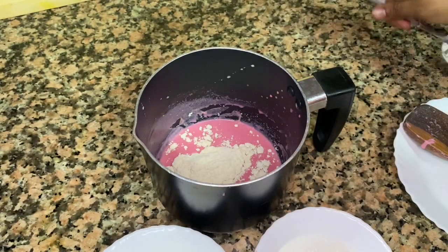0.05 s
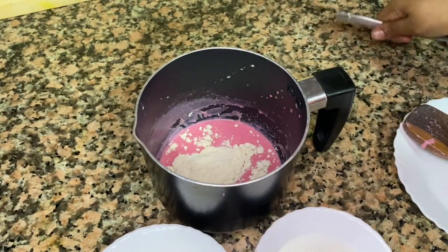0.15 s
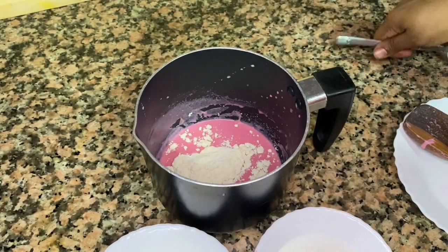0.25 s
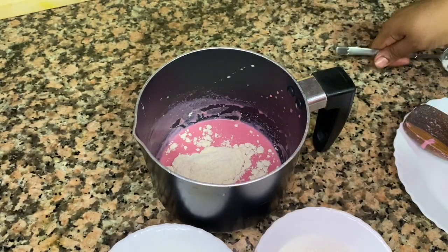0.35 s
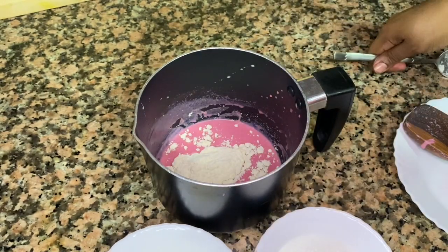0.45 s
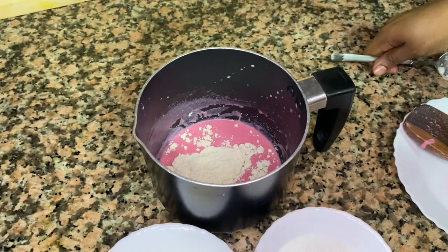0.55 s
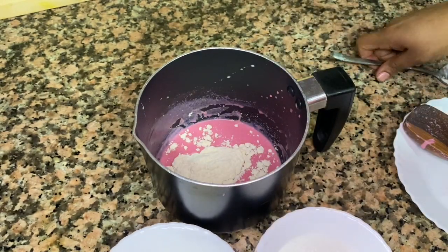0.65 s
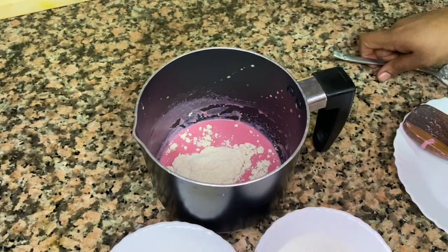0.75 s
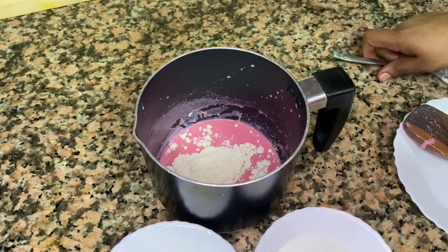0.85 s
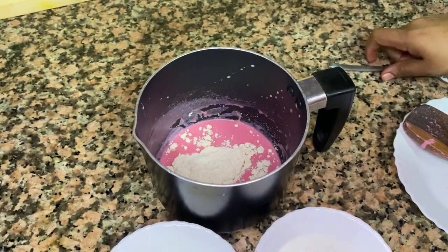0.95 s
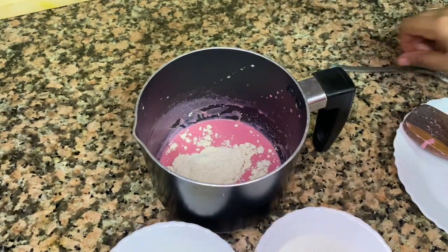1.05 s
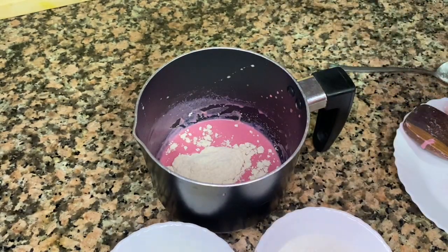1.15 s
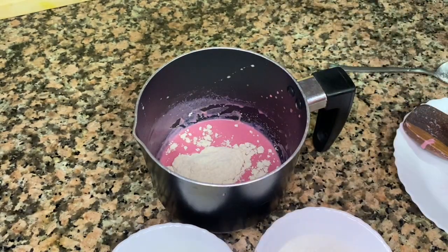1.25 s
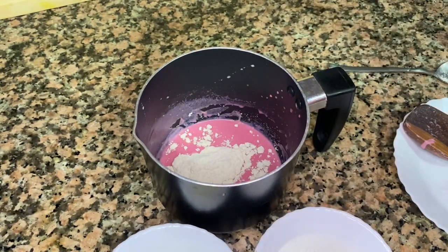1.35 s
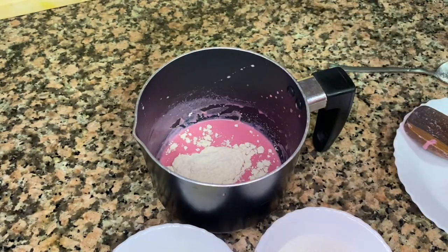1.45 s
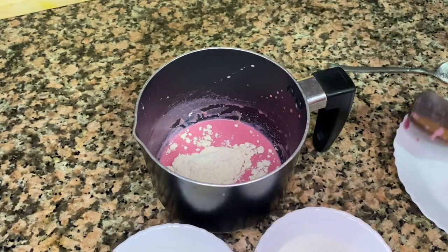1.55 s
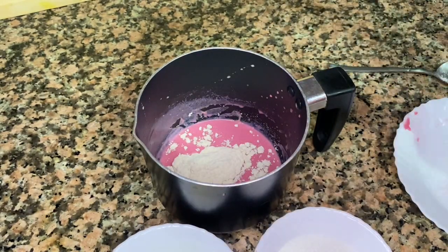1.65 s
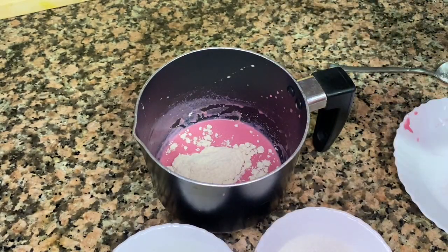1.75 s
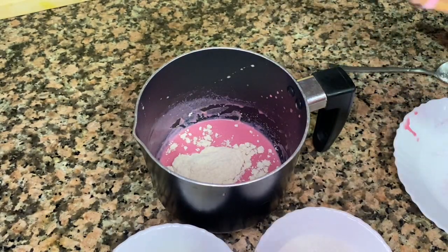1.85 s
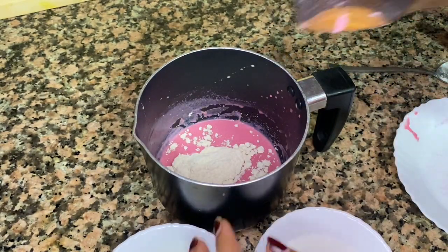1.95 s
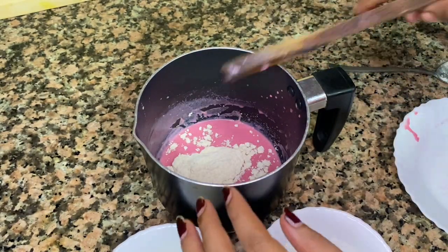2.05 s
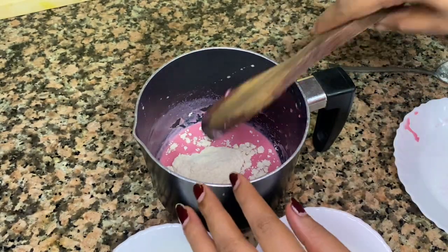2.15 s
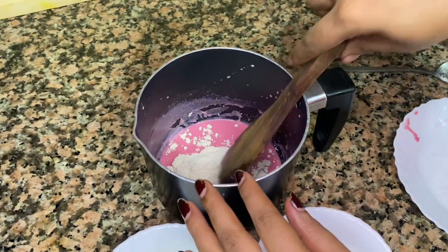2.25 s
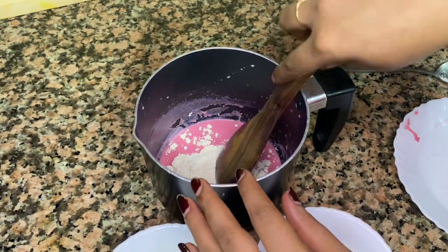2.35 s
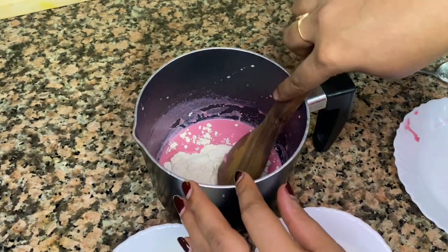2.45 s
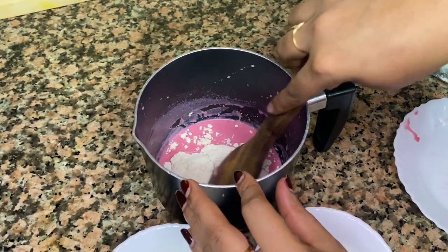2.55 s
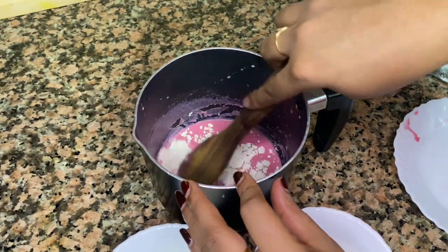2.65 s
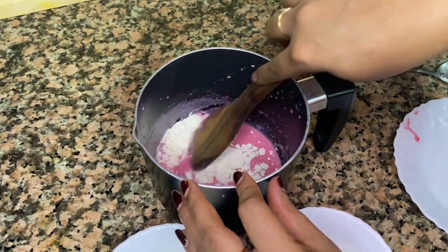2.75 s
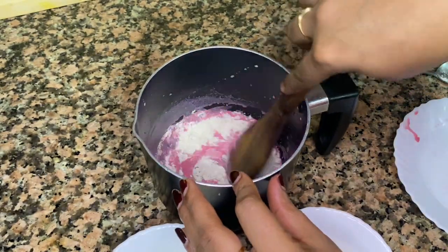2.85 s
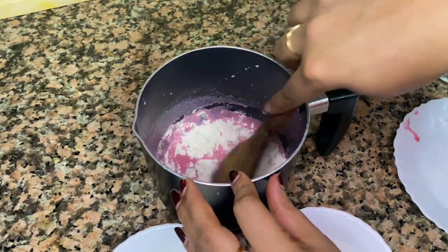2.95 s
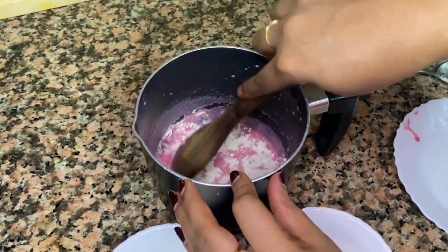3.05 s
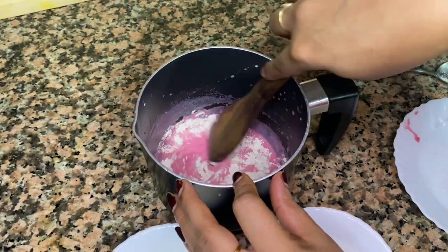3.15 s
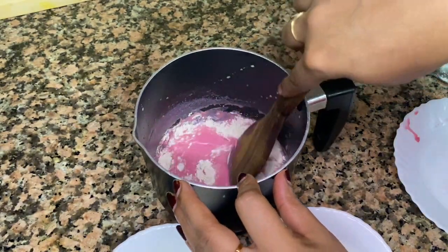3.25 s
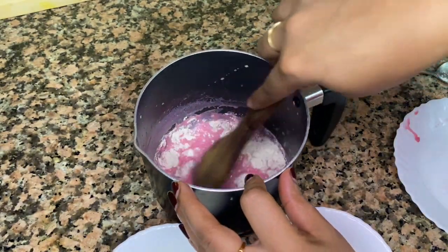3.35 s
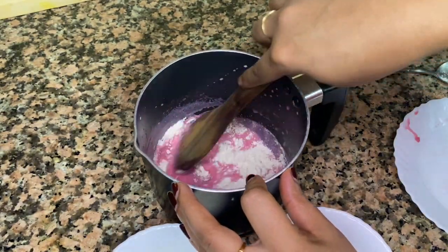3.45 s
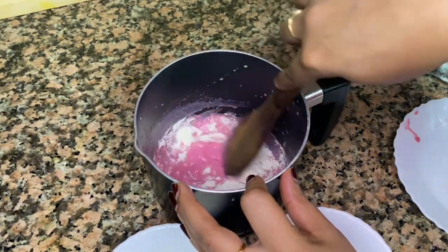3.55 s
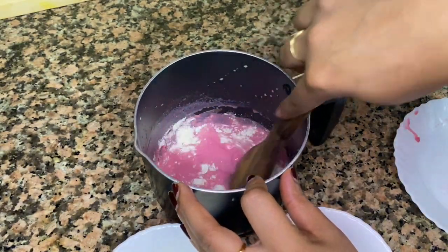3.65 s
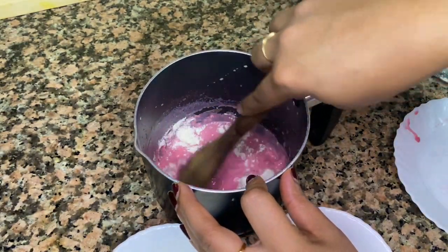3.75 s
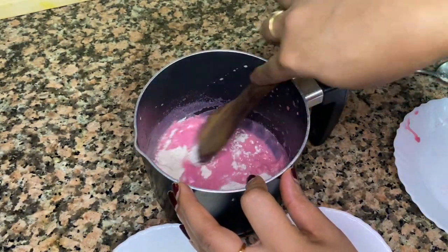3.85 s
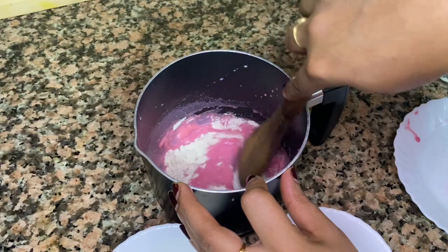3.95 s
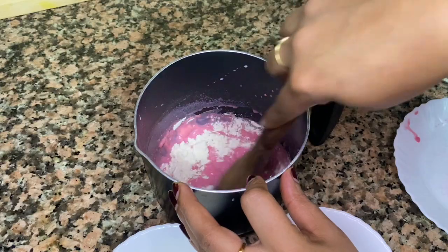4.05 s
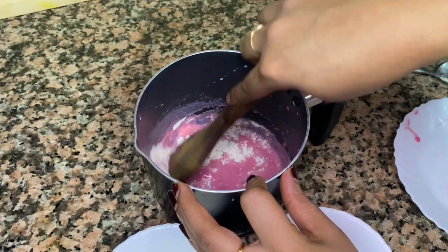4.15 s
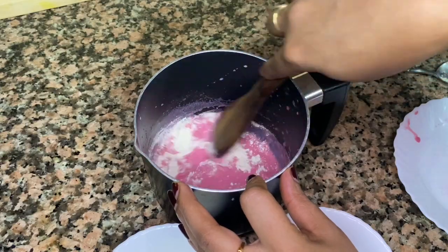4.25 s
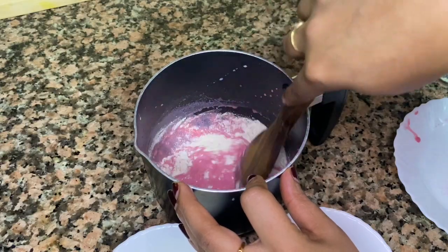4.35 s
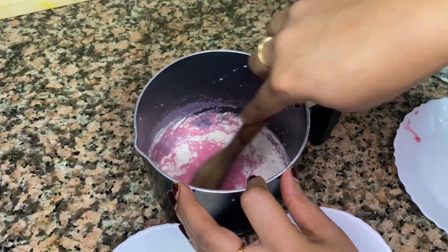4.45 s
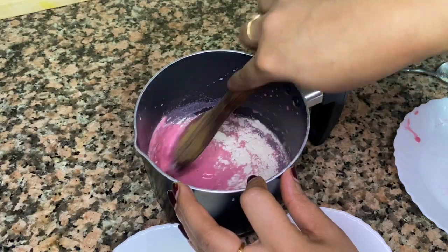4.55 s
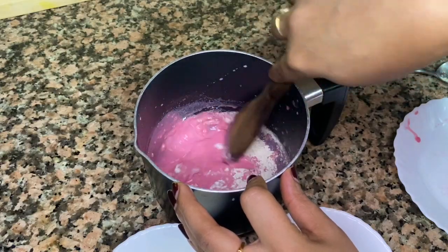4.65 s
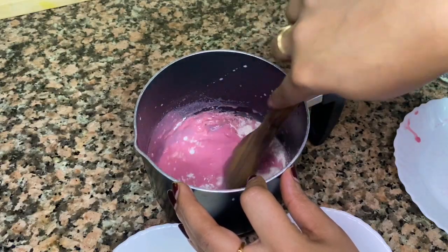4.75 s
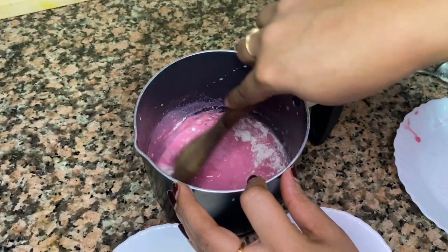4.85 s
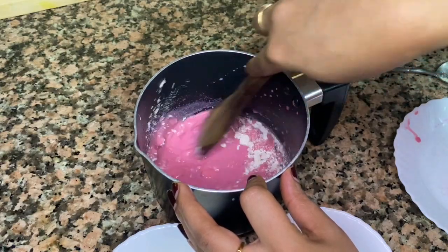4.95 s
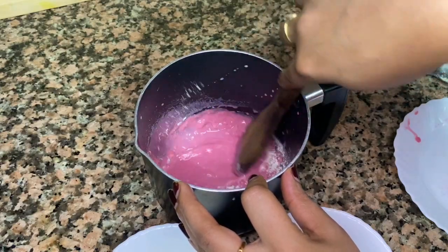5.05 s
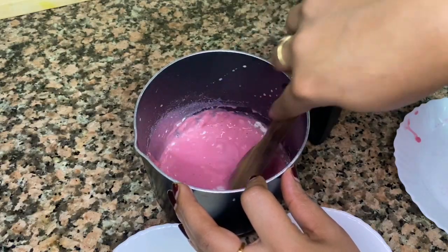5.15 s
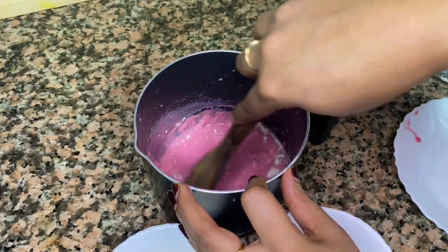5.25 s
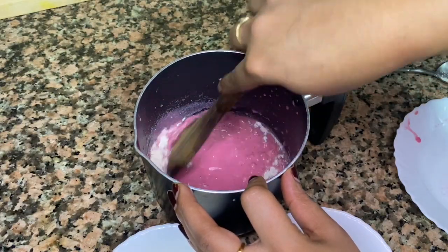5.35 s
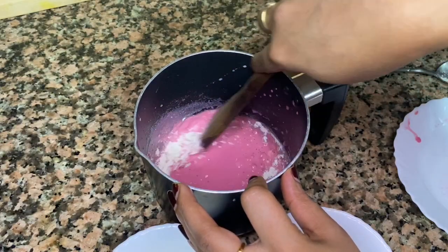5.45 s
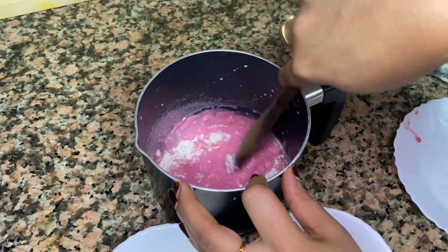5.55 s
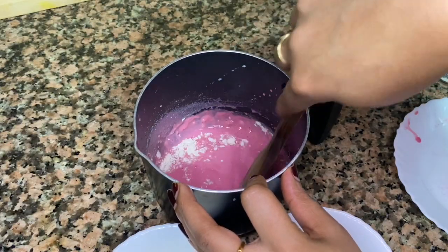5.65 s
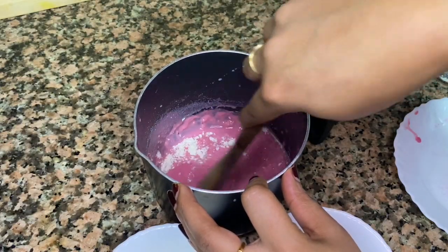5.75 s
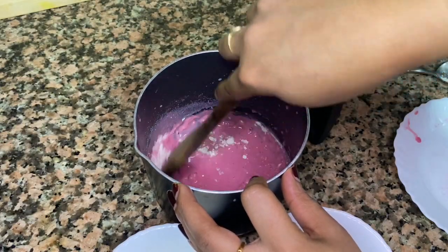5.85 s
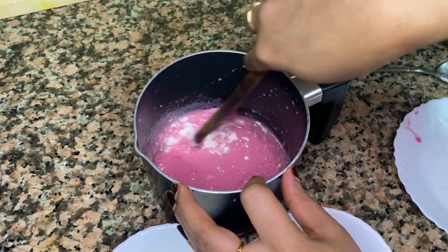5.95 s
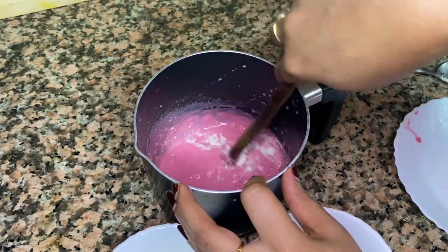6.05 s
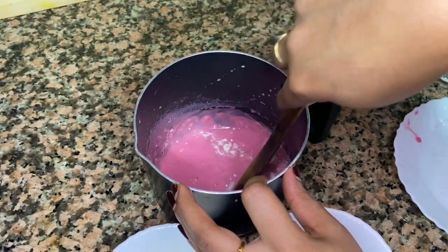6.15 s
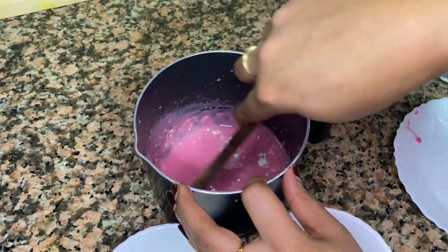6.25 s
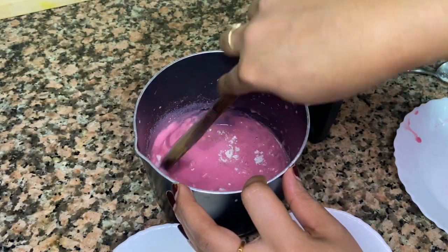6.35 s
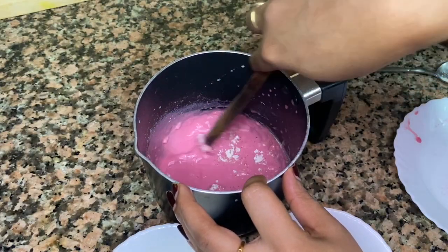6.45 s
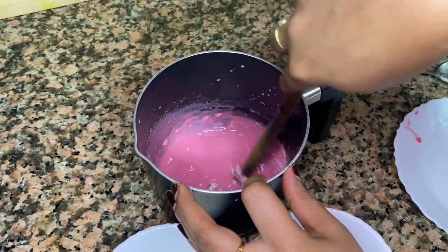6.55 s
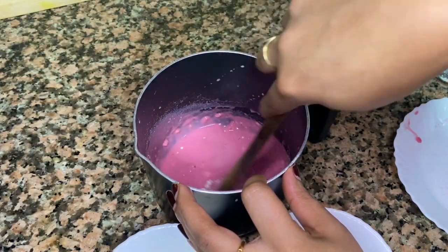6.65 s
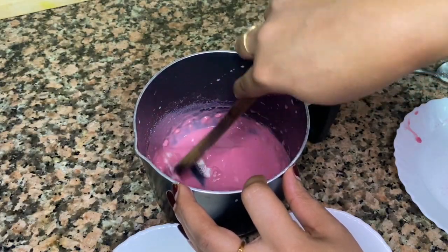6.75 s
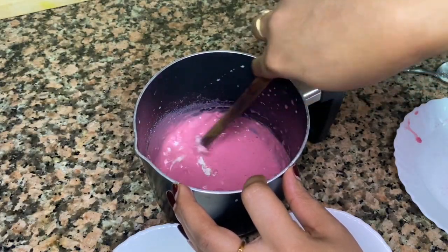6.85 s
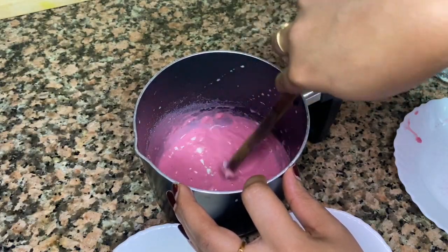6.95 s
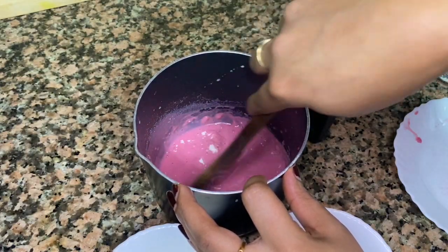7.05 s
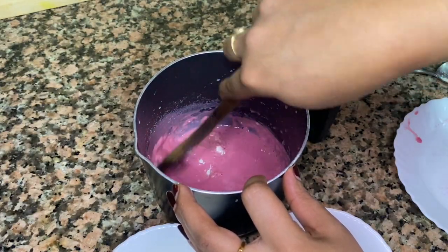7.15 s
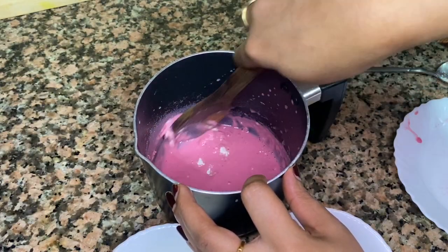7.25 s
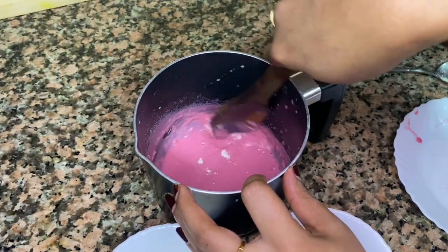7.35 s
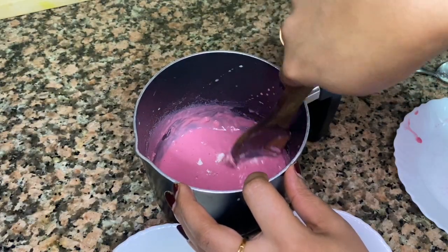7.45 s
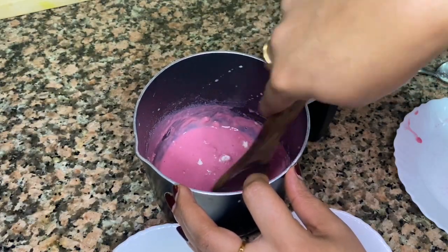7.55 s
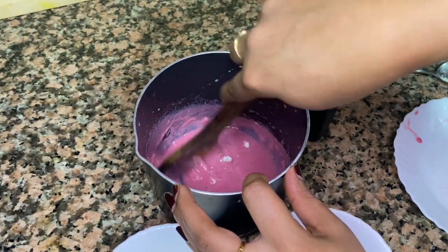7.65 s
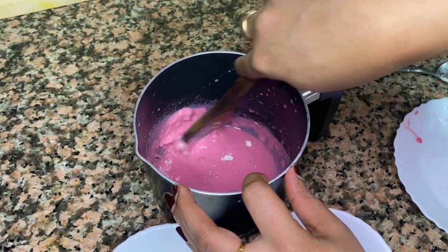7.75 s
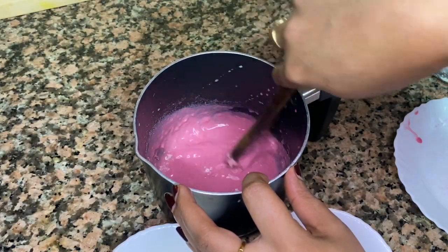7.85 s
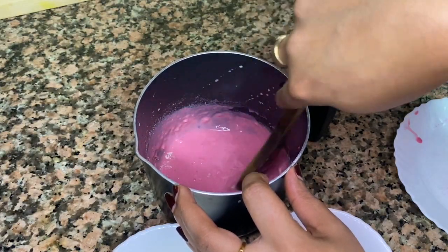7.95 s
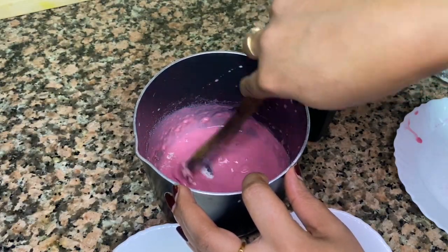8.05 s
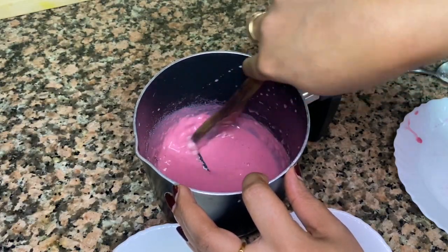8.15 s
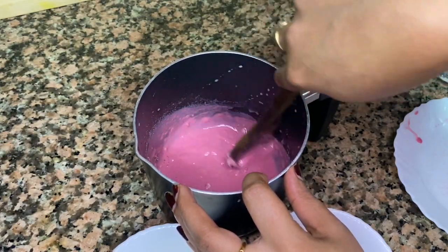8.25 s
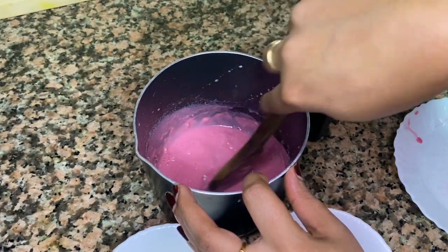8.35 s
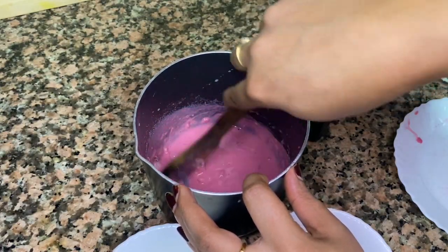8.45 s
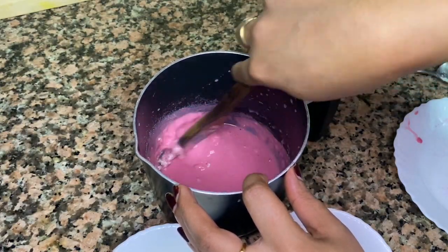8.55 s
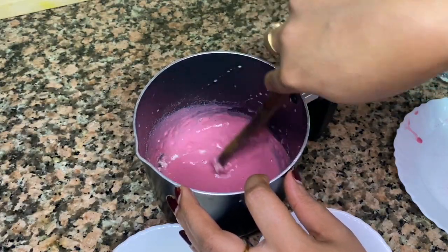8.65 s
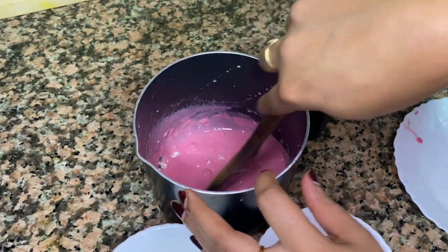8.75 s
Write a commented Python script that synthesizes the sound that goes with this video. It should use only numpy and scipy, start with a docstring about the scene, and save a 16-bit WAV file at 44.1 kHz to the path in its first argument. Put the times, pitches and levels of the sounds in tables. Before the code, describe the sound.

A metal spoon clatters and rings on a stone counter, then a wooden spatula steadily scrapes and knocks while stirring thick liquid in a small pan.

```python
"""In a small, hard kitchen, a steel spoon is laid on a stone counter, where it chatters and rings.
A wet wooden spatula slides off a plate, fingers steady a small saucepan, and the spatula stirs powder into
a thick liquid, two or three turns a second: it judders over the bottom, scrapes along the wall, knocks the pan.
Metal rings are fading tones, knocks are brief noises through resonances, rubbing is a rush of random tiny pushes."""
import sys
import numpy as np
from scipy import signal
from scipy.fft import rfft, irfft, next_fast_len
from scipy.io import wavfile
from scipy.ndimage import uniform_filter1d, map_coordinates

SR = 44100
rng = np.random.default_rng(int(sys.argv[2]) if len(sys.argv) > 2 else 0)


def store_wav(level_fs):
    """Save 16-bit WAV to argv[1]."""
    pcm = np.round(np.clip(np.atleast_2d(level_fs), -1, 1) * 32767)
    wavfile.write(sys.argv[1], SR, pcm.T.astype(np.int16))


N = 388080  # length in samples

# In all tables the levels are relative: each sound adds its own fixed offsets. "Fade time" is for 60 dB.

# Colour of the room noise. Each row: frequency in Hz, level in dB.
FLOOR_COLOUR = [(12, -46.5), (20, -13.5), (86, -0.5), (172, -14), (204, -4.5), (228, -15), (738, -18),
                (897, -17), (2320, -25.5), (4670, -27), (5380, -28), (7950, -28), (9400, -29),
                (16000, -24.5)]
HUSH_DB = -58.5  # level of the room noise
# How long the kitchen echoes. Each row: frequency in Hz, fade time in seconds.
KITCHEN_FADE = [(100, 0.22), (500, 0.41), (2000, 0.27), (8000, 0.31), (15000, 0.12)]
TOP_HZ = 15900  # middle of the cutoff at the top of the microphone's band
# One dry click: start in seconds, peak level in dB.
DRY_CLICK = (1.4559, -23)

# Dull clacks of utensils and crockery on the counter. Each row: start in seconds, level in dB.
COUNTER_CLACKS = [(0.264, -12), (0.27, -16.5), (0.289, -25.5), (0.362, -24), (0.386, -27), (0.393, -26),
                  (0.409, -19.5), (0.717, -30), (0.729, -29), (0.935, -21.5), (1.291, -34.5),
                  (1.309, -25.5), (1.316, -31), (1.34, -37), (1.407, -31), (1.412, -29)]
# Colour of a clack. Each row: frequency in Hz, level in dB.
CLACK_COLOUR = [(59, -50), (100, -7.5), (271, -18.5), (608, -10.5), (818, -13), (1420, 1), (1580, -10),
                (2860, -16.5), (3320, -28.5), (3780, -25.5), (4110, -54), (9020, -57), (13200, -36),
                (15000, -29.5), (16000, -35.5)]
# Hollow ring of the clacks. Each row: frequency in Hz, width in Hz, level in dB.
STONE_RING = [(1057, 64, -4), (1232, 32, 5.5), (1310, 110, -2.5), (1581, 23, -10.5), (3530, 25, -22.5)]

# The spoon strikes the stone. Each row: start in seconds, contact level in dB, ring level in dB,
# ring length as a share of full length (0-1).
SPOON_STRIKES = [(0.407, -18.5, -33.5, 0.27), (.936, -9, -10.5, 1), (.944, -12.5, -21, .08),
                 (0.961, -21.5, -26, .2), (1.0, -17, -30.5, .3)]
# Tones of the spoon's steel. Each row: frequency in Hz, level in dB, fade time in seconds at full length.
STEEL_TONES = [(3029, -7, .28), (3402, -26, .3), (3934, -13, .32), (3957, -17, .3), (5336, -17, .48),
               (5631, -2.5, .26), (7372, -14.5, .34), (7411, -12, .34), (8912, -2.5, .3), (9112, -14, .25),
               (11562, 2, .29), (11680, -15, .22), (11786, -14, .2), (12340, -10, .27), (13743, -7, .25),
               (14640, -9, .2), (14700, -12, .2), (14850, -2.5, .22)]
# The spoon's bowl first bumps the counter: start in seconds, ring level in dB.
BOWL_BUMP = (.264, -37)
# Tones of that bump. Each row: frequency in Hz, level in dB, fade time in seconds at full length.
BOWL_TONES = [(3700, -10, 0.41), (10640, 2, 0.035), (12860, -12, .2), (13740, -5, 0.17), (15000, -2, 0.18)]
# The spoon touches down while still in the fingers: start in seconds, ring level in dB.
HELD_TOUCH = (.408, -31)
# Tones of that touch. Each row: frequency in Hz, level in dB, fade time in seconds at full length.
TIP_TONES = [(3040, -2.5, 0.19), (4090, 1.5, 0.06), (5170, -9, 0.14), (8900, -7, 0.22), (11540, -21, .28),
             (12350, -8.5, 0.46), (14790, -8, 0.53)]
# Light taps of the spoon's handle. Each row: start in seconds, level in dB.
HANDLE_TAPS = [(.718, -35), (.729, -39)]
# Tones of those taps. Each row: frequency in Hz, level in dB, fade time in seconds at full length.
HANDLE_TONES = [(3820, -3, .18), (6580, 0.5, 0.049), (9695, -16, .18), (13300, -7, .09)]

# The spatula slides off the plate. Each row: start in seconds, length in seconds, hiss level in dB.
PLATE_SLIDES = [(1.495, 0.15, -51), (1.795, .005, -55)]
# Colour of that hiss. Each row: frequency in Hz, level in dB.
SMEAR_COLOUR = [(1180, -56), (2000, -17), (3340, -13), (4050, -16), (4940, -2.5), (7310, -12), (9010, -3),
                (14400, -7), (16000, -5)]
# Sticky ticks of the wet mixture. Each row: start in seconds, level in dB.
STICKY_TICKS = [(1.6717, -31), (1.6887, -29.5), (1.8, -33.5), (2.1672, -50), (2.7864, -33), (3.4378, -31),
                (4.0818, -32), (4.2067, -28), (4.875, -27), (4.8834, -30.5), (5.009, -33), (5.2936, -37),
                (5.3485, -36.5), (6.231, -26), (6.7687, -31), (7.1306, -25)]
# Colour of a tick. Each row: frequency in Hz, level in dB.
TICK_COLOUR = [(500, -24), (3000, -15.5), (9000, -7), (13500, -1.5), (16000, 2)]

# Thumps against the pan and the counter. Each row: start in seconds, then the levels of
# thud, body and edge in dB.
PAN_KNOCKS = [(2.168, -54, -52, -67), (2.307, -34, -42.5, -66), (2.402, -31.5, -33.5, -45),
              (2.788, -33.5, -39, -61), (2.831, -42, -40, -38.5), (2.879, -37.5, -36, -42),
              (3.575, -35.5, -47, -45), (3.866, -46, -52, -44), (3.926, -36, -46, -38),
              (4.273, -25.5, -39, -34.5), (4.32, -33, -29.5, -40.5), (4.681, -31, -35, -39.5),
              (4.884, -35, -31.5, -55), (5.012, -29, -48, -36.5), (5.097, -27, -24, -35),
              (5.52, -28.5, -37.5, -49), (5.611, -25.5, -33.5, -37), (5.700, -29.5, -30, -20),
              (6.015, -42, -36, -66), (6.075, -32.5, -53, -43.5), (6.119, -33, -31.5, -49),
              (6.233, -38.5, -26.5, -33.5), (6.549, -27.5, -34, -53), (6.578, -41, -27.5, -58),
              (6.775, -51, -50, -36.5), (6.921, -56, -34.5, -55), (7.135, -37.5, -25, -30.5),
              (7.374, -27, -40, -36), (7.401, -37, -34, -40.5), (7.467, -28.5, -27.5, -42),
              (7.718, -44.5, -31, -46.5), (7.751, -48, -37.5, -50), (8.211, -62, -33, -49),
              (8.242, -56, -34, -48), (8.617, -53, -30.5, -53)]
# Thud: the pan on the counter. Each row: frequency in Hz, width in Hz, level in dB.
THUD_RESONANCES = [(122.4, 15, 1), (205, 15.3, 1), (258, 31, -7.5), (367.5, 37.6, 1.5)]
# Body: the air in the pan. Each row: frequency in Hz, width in Hz, level in dB.
BODY_RESONANCES = [(365, 26.5, -5.5), (464, 29.4, -0.5), (565, 112, 2.5), (611, 106, 2.5)]
# Edge: the wall of the pan. Each row: frequency in Hz, width in Hz, level in dB.
EDGE_RESONANCES = [(768, 50, 4.5), (1094, 280, 2), (1152, 135, 5), (1404, 58, -1), (1686, 83, 0.5),
                   (2060, 200, -15), (2630, 150, -30), (3920, 210, -27)]
# Tones of the pan's metal. Each row: frequency in Hz, level in dB, fade time in seconds at full length.
PAN_TONES = [(251, -7.5, 0.42), (331, 8.5, 0.27), (488, -7.5, 0.24), (726, 3, 0.41), (1400, -9.5, 0.29)]
GRIP_S = 2.6  # from here on the fingers damp the pan

# The blade swipes along the wall, between pushes and during them. Each row: start in seconds,
# length in seconds, rasp level in dB, grit level in dB.
WALL_SCRAPES = [(2.6, 0.17, -61, -57), (2.735, 0.19, -53.5, -50.5), (3.04, 0.087, -54.5, -52.5),
                (3.305, 0.13, -50.5, -50.5), (3.55, 0.18, -53.5, -61), (3.69, 0.13, -53.5, -50),
                (3.92, 0.016, -49.5, -65), (4.045, 0.022, -51.5, -45.5), (4.21, 0.073, -57.5, -51),
                (4.405, 0.046, -48.5, -49.5), (4.59, 0.028, -67, -49.5), (4.785, 0.02, -46, -51),
                (4.87, 0.17, -76, -56.5), (5.165, 0.023, -45.5, -48), (5.54, 0.13, -54, -69),
                (5.685, 0.017, -54, -48), (5.83, 0.14, -66.5, -57), (6.2, 0.037, -48.5, -50),
                (6.31, 0.13, -59, -57), (6.55, 0.02, -47.5, -55.5), (6.665, 0.04, -41.5, -47),
                (6.775, 0.073, -57, -53.5), (7.025, 0.046, -47, -49), (7.39, 0.051, -48.5, -57.5),
                (7.56, 0.082, -49, -46.5), (7.73, .1, -59, -60), (8.04, 0.035, -38.5, -49.5),
                (8.38, 0.035, -45.5, -50), (8.785, .03, -40.5, -59)]
SCRAPE_ATTACK_S, SCRAPE_RELEASE_S = 0.065, 0.11  # time to swell and to fade by 20 dB
# Fingers brush the pan as they take hold. Each row: start in seconds, length in seconds,
# rasp level in dB, grit level in dB.
FINGER_TOUCH = [(2.168, .012, -48, -53.5)]
# Colour of the rasp. Each row: frequency in Hz, level in dB.
RASP_COLOUR = [(440, -20), (750, -7), (778, -4), (945, -4.5), (1040, 0.5), (1150, 2), (1260, -6.5),
               (1440, -0.5), (1650, -6), (2380, -6), (2570, -19), (2850, -12), (3200, -9), (4160, -62),
               (7040, -120)]
# Colour of the grit. Each row: frequency in Hz, level in dB.
GRIT_COLOUR = [(1290, -18), (2200, -10), (2550, 0.5), (2850, -11.5), (4070, -1), (5300, -5.5), (6260, -3),
               (6580, -5), (8950, -10.5), (10700, -11.5), (12900, -14.5), (14800, -20), (16000, -13)]
# The hollow of the pan. Each row: frequency in Hz, width in Hz, level in dB.
WALL_RESONANCES = [(1046, 19, -4), (1527, 270, 14.5), (1730, 68, 2), (2324, 49, 7), (4130, 56, -10),
                   (6440, 43, 8.5), (7500, 173, -13)]

# The blade pushes the mixture over the bottom, about once a turn. Each row: start in seconds,
# length in seconds, level in dB.
BOTTOM_PUSHES = [(2.727, .16, -47), (3.074, 0.12, -46.5), (3.468, 0.12, -43), (3.844, 0.085, -42),
                 (4.112, 0.2, -42.5), (4.495, 0.19, -44), (4.88, 0.2, -43.5), (5.31, 0.066, -43.5),
                 (5.513, 0.15, -45.5), (5.807, 0.15, -43.5), (6.039, 0.14, -47.5), (6.299, 0.33, -43),
                 (6.849, 0.145, -46), (7.142, 0.094, -46), (7.444, 0.098, -48), (7.684, 0.25, -43.5),
                 (8.1, 0.16, -43.5), (8.519, .15, -43.5)]
PUSH_ATTACK_S, PUSH_RELEASE_S = 0.078, 0.046  # time to swell and to fade by 20 dB
PUSH_RASP_DB, PUSH_GRIT_DB = -14, -18.5  # rasp and grit gain of a push, relative to its judder gain
CREST_DB = 1  # every stroke is firmest halfway through, by this much over its ends
# Colour of the judder. Each row: frequency in Hz, level in dB.
JUDDER_COLOUR = [(76, -92), (130, -7), (194, -32), (226, -21.5), (363, -4), (397, -11.5), (467, -4.5),
                 (497, -10), (589, -7), (700, -8), (805, -27), (945, -25), (1100, -22), (1430, -62.5),
                 (2420, -120)]
# The air under the blade. Each row: frequency in Hz, width in Hz, level in dB.
CAVITY_RESONANCE = [(576, 111, 0)]
NOTE_SAG, NOTE_WAVER = 0.06, 0.03  # depth of the note's fall, to either side, and waver (shares of its pitch)
STIR_S = 2.73  # from here on the blade always drags a little
DRAG_JUDDER_DB, DRAG_RASP_DB, DRAG_GRIT_DB = -61.5, -59, -63.5  # gain of that drag at its start
THICKEN_DB_PER_S = 2.5  # the drag judders more as the powder thickens the liquid


def amp(db):
    """Decibels to gain."""
    return 10 ** (np.asarray(db) / 20)


def unit(x):
    """Scale to an average (rms) level of 1."""
    return x / np.sqrt(np.mean(x ** 2) + 1e-20)


def peaked(x):
    """Scale to peak 1."""
    return x / np.abs(x).max()


def along(points, hz):
    """Read a curve of (Hz, value) points on a logarithmic frequency axis."""
    point_hz, value = np.transpose(points)
    return np.interp(np.log(hz + 1), np.log(point_hz + 1), value)


def wobble(rate, size):
    """A smooth random curve through `rate` random points a second."""
    points = rng.standard_normal(size // 50)
    return map_coordinates(points, [np.arange(size) * rate / SR], mode="wrap")


def filtered(x, response):
    """Multiply the spectrum of x by a response of frequency."""
    size = next_fast_len(len(x) + SR // 4)
    hz = np.fft.rfftfreq(size, 1 / SR)
    return irfft(rfft(x, size) * response(hz), size)[:len(x)]


def coloured(x, spectrum):
    """Give x the tone colour of (Hz, dB) points, with a filter that never sounds before its input."""
    size = 4096
    gain = amp(along(spectrum, np.fft.rfftfreq(size, 1 / SR)))
    cepstrum = irfft(np.log(gain + 1e-6))
    # folding the cepstrum onto its first half makes the filter react as early as it can (minimum phase)
    fold = 1 + np.sign(size // 2 - np.arange(size))
    fold[0] = 1
    kernel = irfft(np.exp(rfft(cepstrum * fold)))
    return signal.fftconvolve(x, kernel)[:len(x)]


def resonant(x, peaks):
    """Pass x through side-by-side resonances of (Hz, width Hz, dB), with alternating signs."""
    def response(hz):
        total = 0
        for k, (centre, width, db) in enumerate(peaks):
            loss = 1j * hz * width
            total = total + (-1) ** k * amp(db) * loss / (centre * centre - hz * hz + loss)
        return total
    return filtered(x, response)


def add(track, s, sound):
    """Mix a sound into the track at time s."""
    part = track[round(s * SR):][:len(sound)]
    part += sound[:len(part)]


def burst(t60):
    """Noise that dies away by 60 dB in t60 seconds."""
    t = np.arange(SR // 3) / SR
    return amp(-60 * t / t60) * rng.standard_normal(len(t))


def contact(t60, chatter):
    """One push, together with the brief noisy chatter of the touching surfaces."""
    rattle = burst(t60)
    return signal.unit_impulse(len(rattle)) + chatter * rattle / np.linalg.norm(rattle)


def ring(modes, length, waver, rattle_s=0):
    """Fading tones that waver as the metal rocks; while it rattles they fade at half speed and sound rough."""
    t = np.arange(SR // 2) / SR
    age = t - 0.5 * np.minimum(t, rattle_s)
    roughness = np.clip(2 - t / (rattle_s + 1e-6), 0, 1)

    def swirl(rate):  # random change of both strength and phase
        return wobble(rate, len(t)) + 1j * wobble(rate, len(t))

    tones = 0
    for hz, db, t60 in modes:
        fade = amp(db - 60 * age / (t60 * length))
        sway = 1 + waver * (swirl(45) + 0.5 * swirl(470) * roughness)
        tones = tones + fade * sway * np.exp(2j * np.pi * (hz * t + rng.random()))
    onset = 1 - np.exp(-t / 0.0005)
    return tones.real * onset / np.linalg.norm([amp(db) for hz, db, t60 in modes])


def slips(rate, spread_db):
    """Random tiny pushes of uneven size and direction, about `rate` a second."""
    happens = rng.random(N) < rate / SR
    direction = rng.choice([-1, 1], N)
    return happens * direction * amp(spread_db * np.clip(rng.standard_normal(N), -2, 2))


def steady(x, span):
    """Even out the loudness over about span seconds, near 1, keeping the faster grain."""
    size = max(int(span * SR), 1)
    power = np.abs(uniform_filter1d(uniform_filter1d(x ** 2, size), size))
    return x / np.sqrt(power + np.mean(x ** 2) / 20)


def room(x, wet_db):
    """Direct sound plus a noisy kitchen echo, 4 ms later, whose fade time depends on the frequency."""
    hz, t, z = signal.stft(rng.standard_normal(SR // 2), SR, nperseg=256)
    fade = amp(-60 * t / along(KITCHEN_FADE, hz)[:, None])
    tail = signal.istft(z * fade, SR, nperseg=256)[1]
    echo = signal.fftconvolve(x, np.pad(tail, (SR // 250, 0)) / np.linalg.norm(tail))
    return x + amp(wet_db) * echo[:len(x)]


def strokes(rows, attack_s, release_s):
    """Swell, crest and fade for each (s, length, dB, ..) row: a gain per sample for each dB column."""
    t = np.arange(N) / SR
    power = np.zeros((len(rows[0]) - 2, N))
    for s, length, *levels in rows:
        near = slice(*np.searchsorted(t, [s - 2 * attack_s, s + length + 2 * release_s]))
        age = t[near] - s
        outside = np.maximum(-age / attack_s, (age - length) / release_s)
        fade_db = -20 * np.maximum(0, outside)
        crest_db = CREST_DB * (np.sin(np.pi * np.clip(age / length, 0, 1)) - 0.5)
        power[:, near] += amp(np.add.outer(levels, fade_db + crest_db)) ** 2
    return np.sqrt(power)


def hush():
    """The quiet background of the kitchen: steady coloured noise."""
    return amp(HUSH_DB) * unit(coloured(rng.standard_normal(N), FLOOR_COLOUR))


def click():
    """A single very short dry click without echo: an impulse and a flash of noise."""
    out = np.zeros(N)
    s, db = DRY_CLICK
    colour = [(300, -5.0), (5000, -7), (7500, -11), (9000, -24.5)]  # (Hz, dB)
    add(out, s, amp(db) * peaked(coloured(contact(t60=0.0028, chatter=0.43), colour)))
    return out


def clacks():
    """Short dull contacts with the stone, each with a brief hollow ring."""
    out = np.zeros(N)
    for s, db in COUNTER_CLACKS:
        blow = contact(t60=0.035, chatter=1.6)
        add(out, s, amp(db - 3.5) * peaked(coloured(blow, CLACK_COLOUR)))
        add(out, s, amp(db - 14.0) * peaked(resonant(blow, STONE_RING)))
    return room(out, wet_db=-8.5)


def spoon():
    """Each bounce cracks, thumps the counter and rings; bowl, tip and handle have thin notes of their own."""
    crack_colour = [(300, -18.0), (2000, -10.0), (4000, -13.5), (9500, -14),
                    (11500, -1.0), (13000, -11.0), (14700, 6.0), (16000, -15.5)]  # (Hz, dB)
    thump_colour = [(20, -11), (60, -6.0), (125, -4.5), (300, -12.5), (550, -12), (900, -35)]  # (Hz, dB)
    cracks, tones = np.zeros(N), np.zeros(N)
    for s, db, ring_db, length in SPOON_STRIKES:
        crack = coloured(contact(t60=0.014, chatter=2.0), crack_colour)
        thump = coloured(contact(t60=0.038, chatter=3.1), thump_colour)
        add(cracks, s, amp(db + 4.5) * peaked(crack) + amp(db - 20) * peaked(thump))
        add(tones, s, amp(ring_db) * ring(STEEL_TONES, length, waver=0.45, rattle_s=0.1 * length))
    s, db = HELD_TOUCH
    add(tones, s, amp(db) * ring(TIP_TONES, 0.82, waver=1.0))
    s, db = BOWL_BUMP
    add(tones, s, amp(db) * ring(BOWL_TONES, 0.59, waver=0.56))
    for s, db in HANDLE_TAPS:
        add(tones, s, amp(db) * peaked(ring(HANDLE_TONES, 0.76, waver=0.9, rattle_s=0.03)))
    return room(cracks, wet_db=0) + room(tones, wet_db=-10.0)


def sticky():
    """The wet blade hisses off the plate in tiny slips; threads and bubbles of the mixture snap."""
    slide_gain = strokes(PLATE_SLIDES, attack_s=0.05, release_s=0.035)[0]
    hiss = unit(coloured(slips(rate=7700, spread_db=6), SMEAR_COLOUR))
    out = slide_gain * amp(3.0) * hiss
    for s, db in STICKY_TICKS:
        add(out, s, amp(db + 2) * peaked(coloured(contact(t60=0.027, chatter=2.7), TICK_COLOUR)))
    return room(out, wet_db=-12)


def knocks():
    """The spatula bumps the pan: its air, wall and metal sound at once, then it rocks on the counter."""
    out = np.zeros(N)
    for s, thud_db, body_db, edge_db in PAN_KNOCKS:
        rocking = contact(t60=0.06, chatter=3.8)
        blow = contact(t60=0.14, chatter=0.56)
        body = amp(body_db + 1.5) * peaked(resonant(blow, BODY_RESONANCES))
        edge = amp(edge_db + 3.5) * peaked(resonant(blow, EDGE_RESONANCES))
        thud = amp(thud_db - 4) * peaked(resonant(rocking, THUD_RESONANCES))
        add(out, s, room(body + edge, wet_db=-9.0))
        add(out, s + 0.004, room(thud, wet_db=-3.5))
        # held by the fingers, the metal rings more softly and briefly
        ring_db, length = (-3, 1) if s < GRIP_S else (-15, 0.4)
        add(out, s, amp(body_db + ring_db) * ring(PAN_TONES, length, waver=0.055))
    return out


def drag(db, growth=0):
    """Gain of the blade's constant light contact, growing by so many dB a second."""
    since = np.arange(N) / SR - STIR_S
    return amp(db + growth * since) * np.clip(since / SCRAPE_ATTACK_S, 0, 1)


def rubbing():
    """Gains of rasp and grit: swipes on the wall, a share of each push, the light drag and the fingers."""
    swipes = strokes(WALL_SCRAPES, SCRAPE_ATTACK_S, SCRAPE_RELEASE_S)
    pushes = amp([[PUSH_RASP_DB], [PUSH_GRIT_DB]]) * strokes(BOTTOM_PUSHES, PUSH_ATTACK_S, PUSH_RELEASE_S)
    light_drag = [drag(DRAG_RASP_DB), drag(DRAG_GRIT_DB)]
    fingers = strokes(FINGER_TOUCH, attack_s=0.0028, release_s=0.12)
    return np.linalg.norm([swipes, pushes, light_drag, fingers], axis=0)  # powers add up


def shifting(x, depth_db, width_hz, rate):
    """Resonances come and go as the blade opens and closes gaps in the pan."""
    hz, t, z = signal.stft(x, SR, nperseg=512)
    knots = rng.standard_normal((200, 300))
    # a smooth random map over frequency and time
    places = np.meshgrid(hz / width_hz, t * rate, indexing="ij")
    field = map_coordinates(knots, places, order=2, mode="wrap")
    return unit(signal.istft(z * amp(depth_db * field), SR, nperseg=512)[1][:N])


def scraping():
    """Wet powder grains rasp and hiss in many tiny slips between the blade and the wall."""
    def hollow(x, share):
        return unit(x) + share * unit(resonant(x, WALL_RESONANCES))

    rasp = coloured(hollow(slips(rate=1100, spread_db=3), share=0.24), RASP_COLOUR)
    grit = coloured(hollow(slips(rate=3500, spread_db=-3.0), share=0.34), GRIT_COLOUR)
    rasp = shifting(room(rasp, wet_db=4.0), depth_db=3.5, width_hz=129.7, rate=16)
    grit = shifting(room(grit, wet_db=-8.0), depth_db=2.0, width_hz=980, rate=12)  # broad changes of colour
    grit = shifting(grit, depth_db=4.5, width_hz=120, rate=34)  # fine, quick changes of colour
    rasp_gain, grit_gain = rubbing()
    rasp = amp(-2.5) * rasp_gain * steady(rasp, span=0.04)
    grit = amp(1.68) * grit_gain * steady(grit, span=0.06)
    grip = amp(1.42 * wobble(40, N))  # the blade catches and lets go
    return grip * (rasp + grit)


def judder():
    """Wood sticks and slips on the bottom; the hollow note sags through each push and recovers before the next."""
    ends = [end for s, length, db in BOTTOM_PUSHES for end in (s, s + length)]
    swing = np.interp(np.arange(N) / SR, np.sort(ends), np.tile([1, -1], len(BOTTOM_PUSHES)))
    note = 1 + NOTE_SAG * swing + NOTE_WAVER * wobble(18, N)
    pulses = coloured(slips(rate=150, spread_db=2.5), JUDDER_COLOUR)
    hollow = unit(resonant(pulses, CAVITY_RESONANCE)) + 0.27 * unit(pulses)
    gliding = map_coordinates(hollow, [np.cumsum(note)], mode="wrap")  # played faster or slower to bend the pitch
    heard = room(gliding, wet_db=-7)
    push_gain = strokes(BOTTOM_PUSHES, PUSH_ATTACK_S, PUSH_RELEASE_S)[0]
    force = np.hypot(push_gain, drag(DRAG_JUDDER_DB, THICKEN_DB_PER_S))
    return force * steady(heard, span=0.03)


def scene():
    """Everything on the counter, heard from just above the pan, as one channel."""
    utensils = clacks() + spoon() + sticky()
    stirring = knocks() + scraping() + judder()
    return (hush() + click() + utensils + stirring)[None]


def record(dry):
    """The microphone's band ends in a narrow slope, above which nothing is kept."""
    edge_hz = 400  # width of the slope

    def response(hz):
        return np.clip(0.5 + (TOP_HZ - hz) / edge_hz, 0, 1)

    return np.array([filtered(channel, response) for channel in dry])


dry = scene()
out = record(dry)
store_wav(out)
```